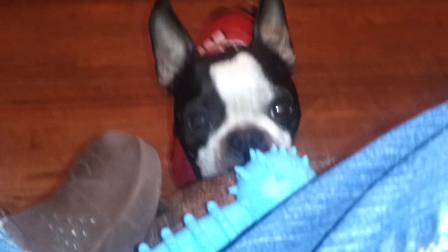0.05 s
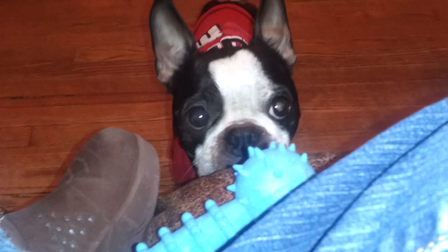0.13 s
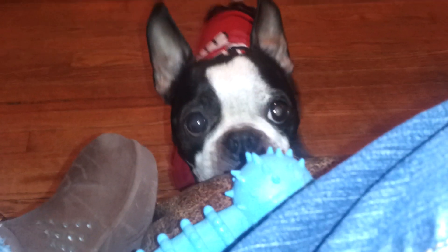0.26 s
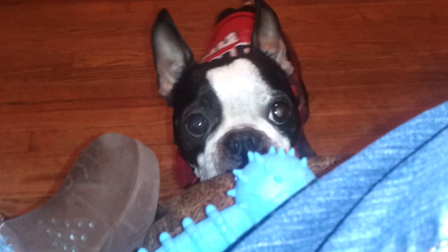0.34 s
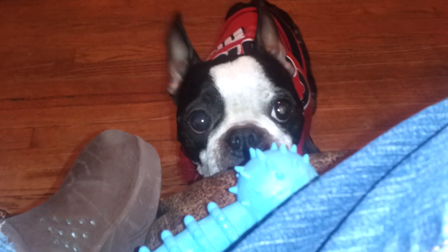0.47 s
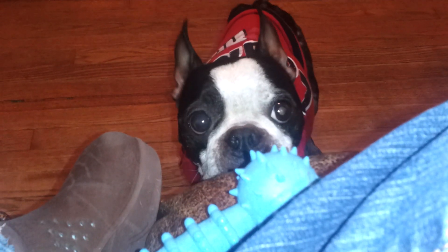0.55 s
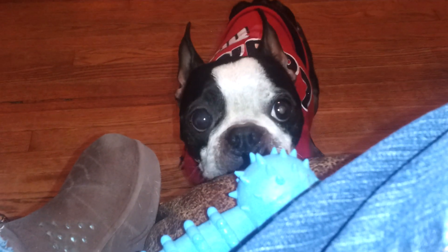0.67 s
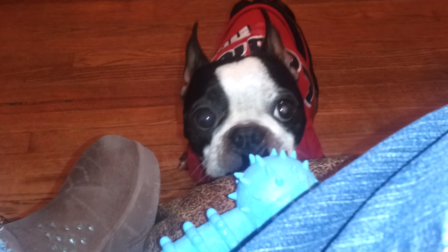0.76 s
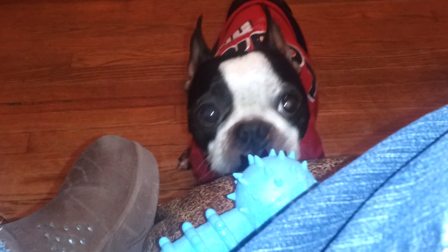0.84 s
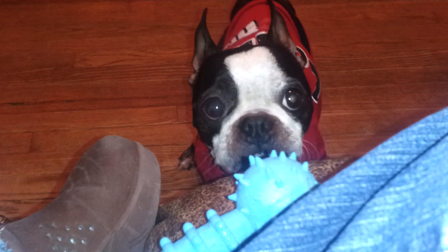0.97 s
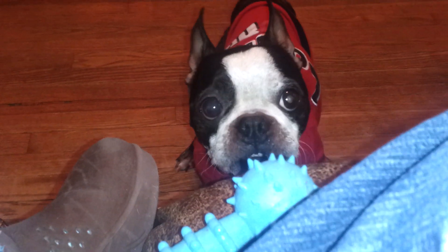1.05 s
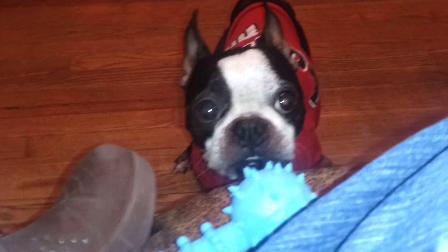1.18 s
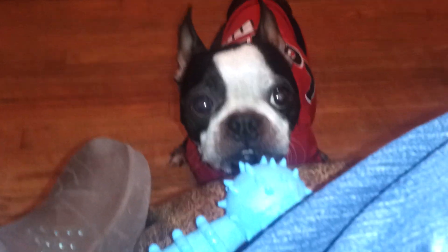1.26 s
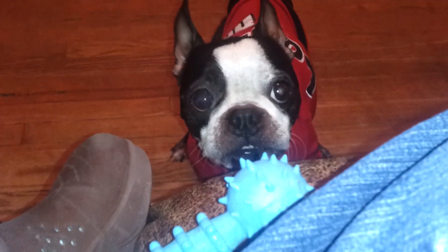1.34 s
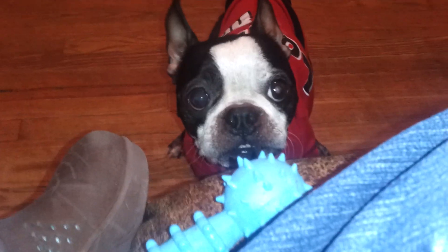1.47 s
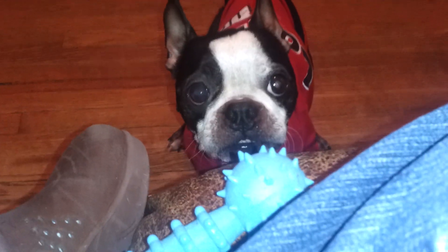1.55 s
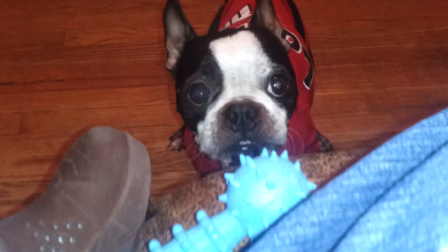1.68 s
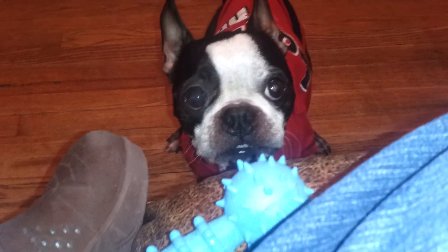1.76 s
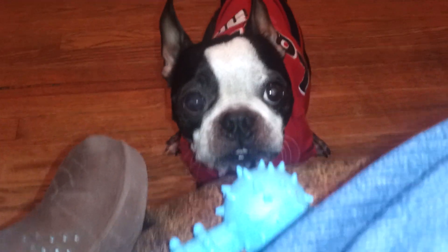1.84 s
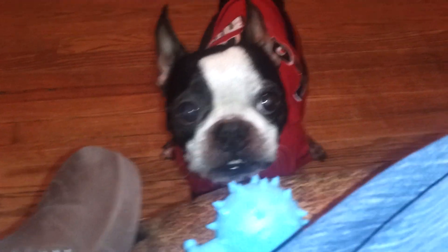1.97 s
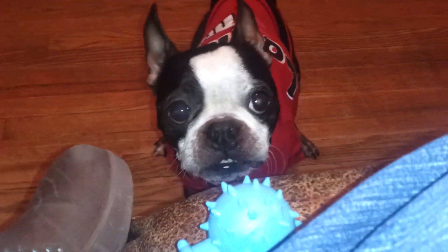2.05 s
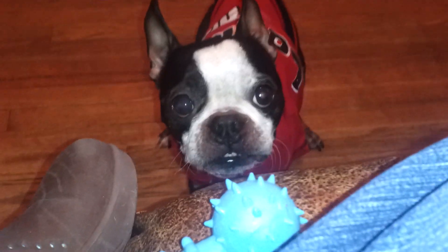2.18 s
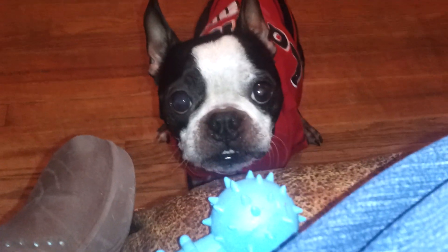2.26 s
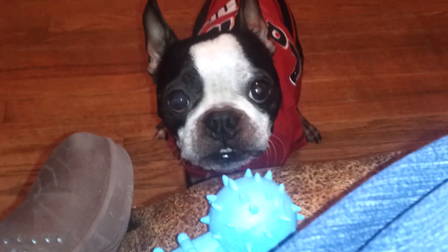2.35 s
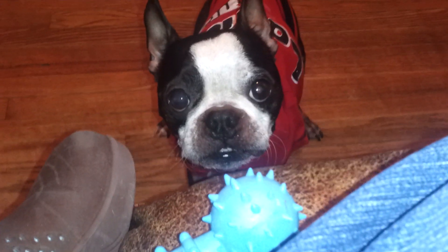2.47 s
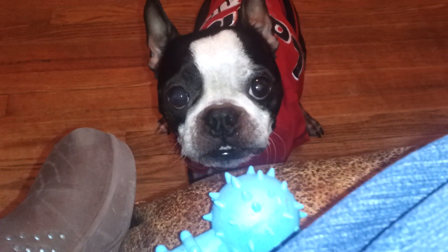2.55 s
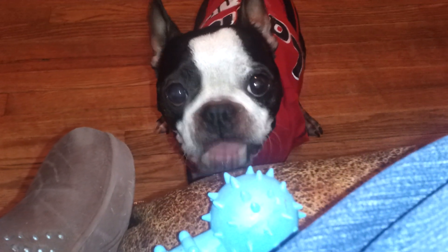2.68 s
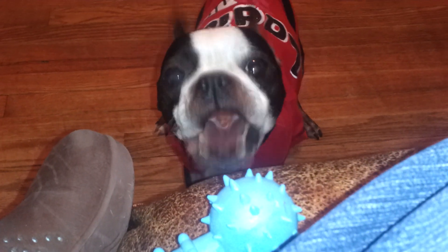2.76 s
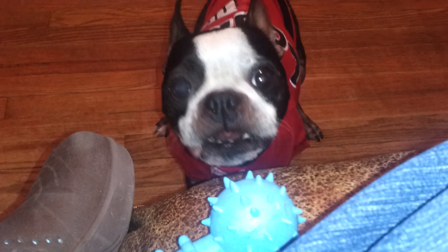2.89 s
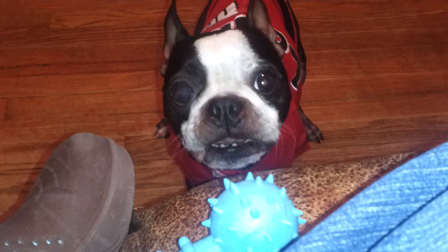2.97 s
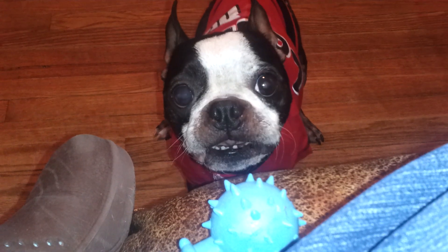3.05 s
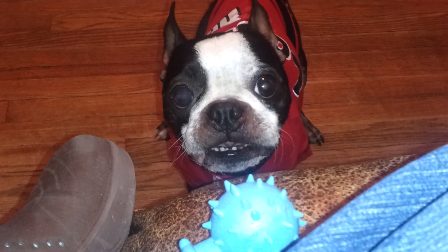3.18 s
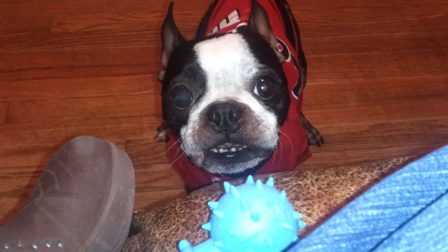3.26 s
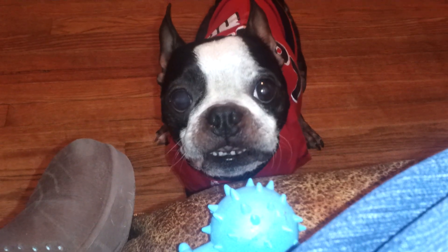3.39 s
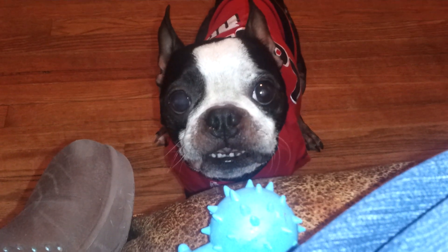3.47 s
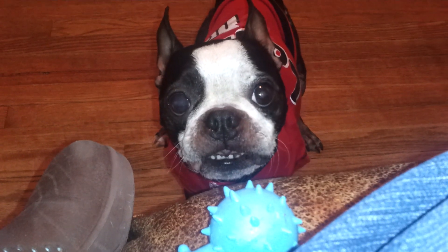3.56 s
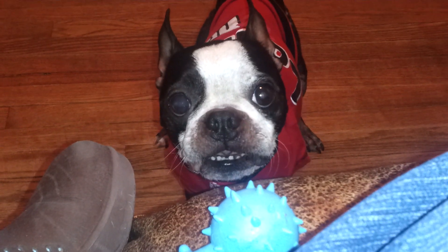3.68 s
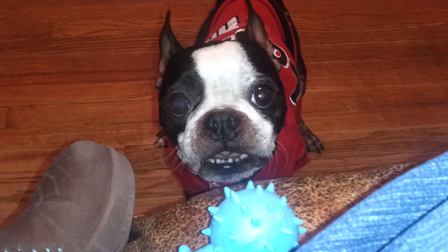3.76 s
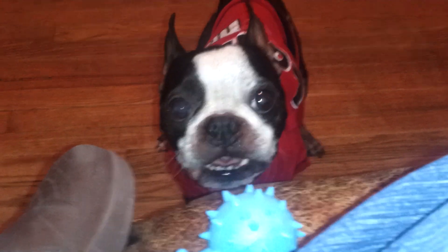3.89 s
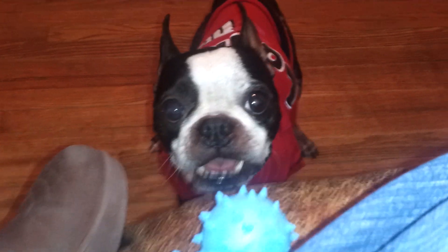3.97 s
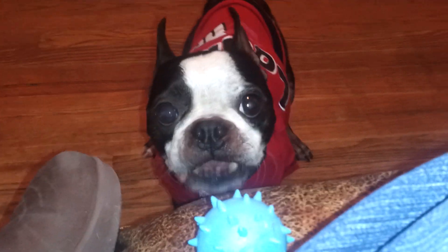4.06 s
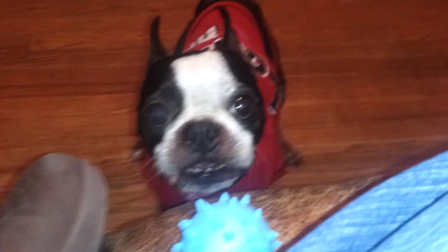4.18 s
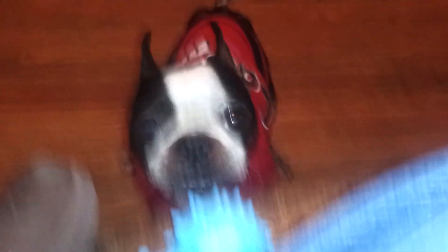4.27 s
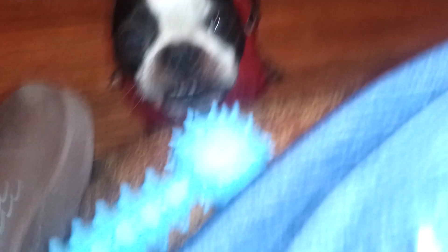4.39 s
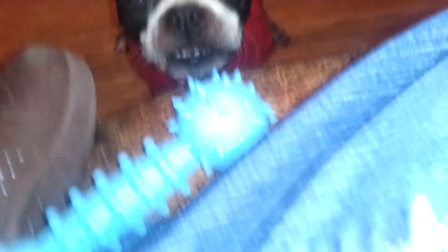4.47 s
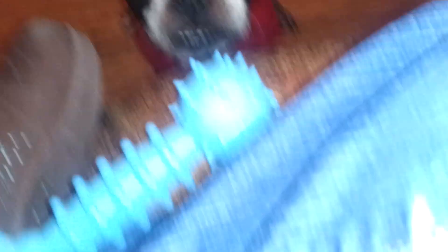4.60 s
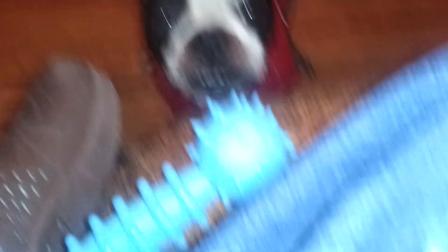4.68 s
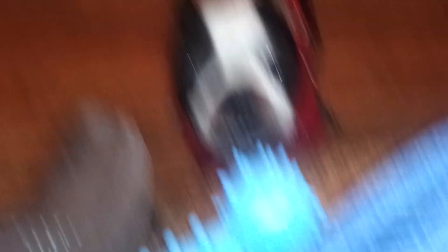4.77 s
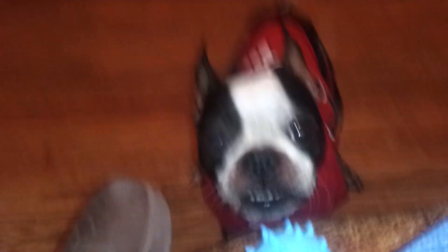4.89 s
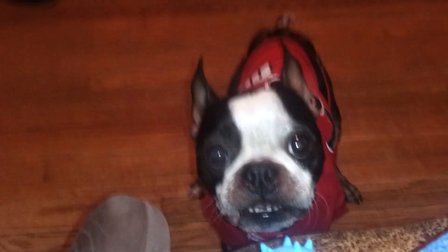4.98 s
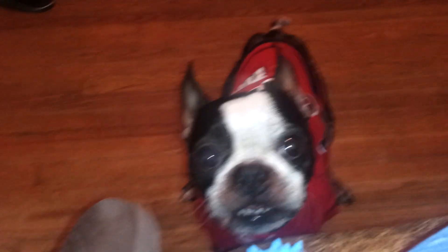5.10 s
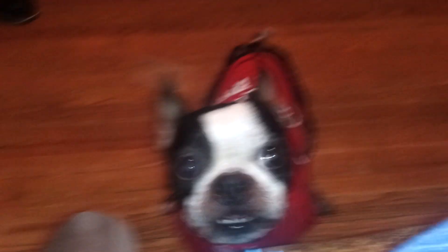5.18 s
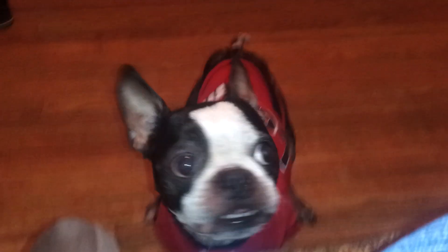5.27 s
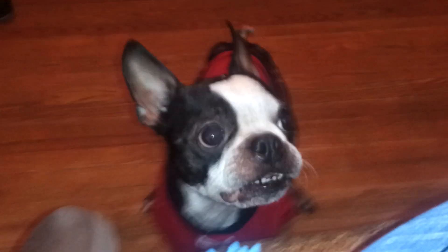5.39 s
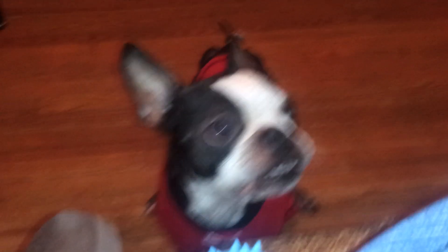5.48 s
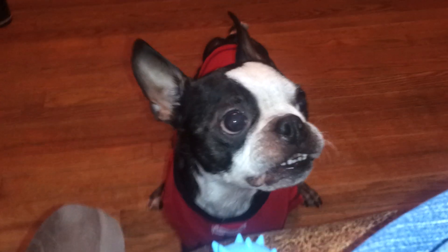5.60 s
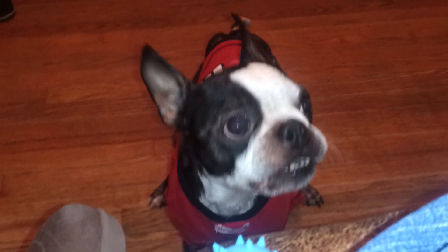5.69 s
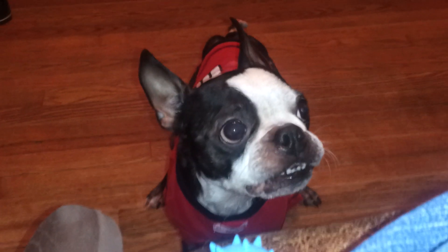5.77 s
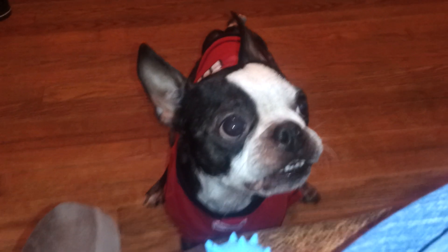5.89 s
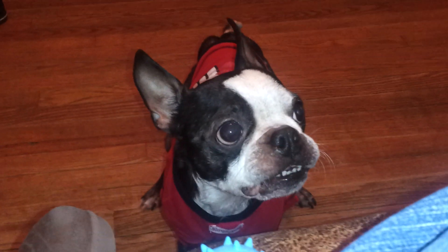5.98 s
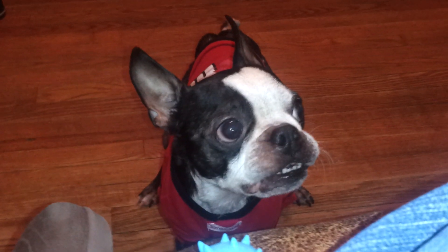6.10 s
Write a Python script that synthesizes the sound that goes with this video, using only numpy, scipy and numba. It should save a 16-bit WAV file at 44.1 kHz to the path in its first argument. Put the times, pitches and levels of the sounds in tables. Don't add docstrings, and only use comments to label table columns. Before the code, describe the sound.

Quiet room tone with low hum and hiss, then a dog's airy snort and soft wavering moan. Paw thuds and claw ticks follow on boards. Abrupt, very loud calls come next: a squeaky yelp, a hoarse bark, a yelp and bark together, another bark, a small rising and sinking whine and one last bark. Gasps fall between them. The close phone microphone overloads, the hard room rings briefly, and the end is nearly still.

```python
import sys
import numpy as np
from scipy import signal
from scipy.fft import rfft, irfft
from scipy.io import wavfile
from scipy.ndimage import uniform_filter1d
from numba import njit

SR = 44100
rng = np.random.default_rng(int(sys.argv[2]) if len(sys.argv) > 2 else 0)


def volts(x):
    e = np.asarray(x, float) / 20
    return 10 ** e


def master_out(mix):
    frames = np.transpose(np.atleast_2d(mix))
    ceiling = np.clip(frames, -1, 1)
    pcm = np.round(ceiling * 32767).astype(np.int16)
    wavfile.write(sys.argv[1], SR, pcm)


N = 270774


@njit
def moving_bandpass(x, hz, width):
    y, b, l = np.empty(len(x)), 0., 0.
    for i in range(len(x)):
        g, k = np.tan(np.pi * hz[i] / SR), width / hz[i]
        v = (b + g * (x[i] - l)) / (1 + g * (g + k))
        b, l, y[i] = 2 * v - b, l + 2 * g * v, k * v
    return y


def band(x, hz, width):
    centre_hz = np.clip(hz + np.zeros(len(x)), 30, SR / 2.3)
    return moving_bandpass(x, centre_hz, max(1. * width, 10.))


def double_band(x, hz, width):
    return band(band(x, hz, width), hz, width)


def resonances(x, modes):
    return sum((-1) ** k * volts(db) * band(x, hz, width) for k, (hz, width, db) in enumerate(modes))


def butter(x, order, hz, kind):
    return signal.sosfilt(signal.butter(order, hz, kind, fs=SR, output="sos"), x)


def unit(x):
    return x / np.sqrt(np.mean(x ** 2))


def read(table):
    s, *columns = np.transpose(table)
    t = np.arange(int(s[0] * SR), int(s[-1] * SR))
    return t[0], [np.interp(t / SR, s, c) for c in columns]


def steps(values, length):
    return np.interp(np.linspace(0, 1, length), np.linspace(0, 1, len(values)), values)


def add(out, start, x):
    edge = np.arange(len(x))
    out[start:start + len(x)] += x * np.minimum(np.minimum(edge, edge[::-1]) / 88, 1)


def folds(hz, rough, weak):
    noise = rng.standard_normal((3, 24000))[:, :len(hz)]
    rough = np.clip(rough, 0, 1)
    shake = unit(uniform_filter1d(uniform_filter1d(noise[0], size=90), size=90))
    phase = np.cumsum(hz * (1 + 0.1227 * rough * shake)) / SR
    harmonics = np.arange(1, 44)[:, None]
    rolloff = np.exp(-(harmonics * hz / 8000) ** 4)
    clean = np.sum(np.cos(2 * np.pi * harmonics * phase) * rolloff, axis=0)
    alternation = 1 + weak * np.cos(np.pi * phase)
    size = alternation * volts(3.1 * rough * unit(uniform_filter1d(noise[1], size=120)))
    hiss = noise[2] * (1 + 0.5 * np.cos(2 * np.pi * phase))
    return size * (clean * np.sqrt(hz / SR) * 2 + 3.31 * rough * hiss)


def call(out, table, voice, throat, mouth_width_hz, top_hz):
    start, (pitch_hz, level_db) = read(table)
    rough, weak, mouth_over_pitch, throat_db = (steps(v, len(pitch_hz)) for v in voice)
    source = folds(pitch_hz, rough, np.clip(weak, 0, 1))
    source = butter(source, 4, top_hz, "low")
    mouth = unit(double_band(source, mouth_over_pitch * pitch_hz, mouth_width_hz))
    share = volts(throat_db)
    voiced = (mouth - share * unit(resonances(source, throat))) / np.sqrt(1 + share ** 2)
    add(out, start, volts(level_db) * voiced)


def air(out, puffs, edge_db, colour):
    for s, rise, hold, fall, top_db in puffs:
        moments = s + np.cumsum(np.abs([0, rise, hold, fall]))
        levels = top_db + np.array([edge_db[0], 0, 0, edge_db[1]])
        start, (level_db,) = read(np.transpose([moments, levels]))
        noise = rng.standard_normal((2, SR))[:, :len(level_db)]
        flutter = volts(2.6 * unit(uniform_filter1d(noise[1], size=400)))
        rush = butter(resonances(noise[0], colour), 4, 9500, "low")
        add(out, start, volts(level_db) * unit(flutter * rush))


# freq_hz, density_db (per Hz)
FLOOR_SPECTRUM = [(18, -53.5), (30, -25.5), (75, 0), (175, -3.5), (320, -5), (660, -9), (5660, -12.5),
                  (13500, -17.5)]


def room_tone():
    hz, db = np.transpose(FLOOR_SPECTRUM)
    shape_db = np.interp(np.log(np.fft.rfftfreq(N, 1 / SR) + 1), np.log(hz), db)
    return volts(-61.5) * unit(irfft(rfft(rng.standard_normal(N)) * volts(shape_db), N))


# start_s, rise_s, hold_s, fall_s, level_db
SNORTS = [
    (0, 0.00053, 0.0036, 0.066, -48),
    (0.145, 0.083, 0.0067, 0.13, -32),
    (5.198, 0.079, 0.0058, .07, -69),
]
SNORT_EDGES = (-27, -19)
# freq_hz, width_hz, level_db
NOSE_MODES = [(2900, 1750, -0.64), (4230, 5450, -0.38), (6600, 2440, 1.3)]


def snort(out):
    air(out, SNORTS, SNORT_EDGES, NOSE_MODES)


# start_s, peak_db, thud_hz, tick_db (against the thud)
CLAW_TICKS = [(0.039, -33.5, 132, -24), (1.109, -41, 340, -9), (1.139, -33, 147, -18.5),
              (1.185, -29, 149, -16), (1.359, -48, 288, -1.5), (1.458, -37, 345, -6.5),
              (3.859, -23.5, 283, -9), (3.909, -25, 345, -29.5), (4.619, -30.5, 527.4, -3),
              (4.654, -37, 137.6, -28), (5.279, -43, 253, -9)]


def claws(out):
    t = np.arange(2000) / SR
    for s, peak_db, thud_hz, tick_db in CLAW_TICKS:
        noise = rng.standard_normal((2, len(t)))
        thud = 6 * band(noise[0] * np.exp(-t / 0.0057), thud_hz, thud_hz)
        tick = double_band(noise[1], 6000, 6000) * np.exp(-t / 0.0051)
        start = int(s * SR)
        out[start:start + len(t)] += volts(peak_db - 13.5) * (thud + volts(tick_db + 10.5) * tick)


# start_s, rise_s, hold_s, fall_s, level_db
GASP_PUFFS = [
    (.37, 0.018, .12, 0.1, -64),
    (1.44, 0.024, 0.056, 0.036, -61),
    (1.96, 0.086, 0.14, 0.097, -54.5),
    (3.279, 0.099, 0.067, 0.024, -55.5),
]
MOUTH_AIR_EDGES = (-8, -16.5)
# freq_hz, width_hz, level_db
OPEN_MOUTH_MODES = [(710, 70, -4), (1350, 430, -4), (1740, 560, -5.5), (3200, 680, -10.5), (6750, 460, -10)]


def gasps(out):
    air(out, GASP_PUFFS, MOUTH_AIR_EDGES, OPEN_MOUTH_MODES)


# time_s, pitch_hz, level_db
MOAN_CURVE = [(.582, 198.9, -53), (.598, 203, -42.5), (.625, 252.5, -33), (.67, 252.4, -35.5),
              (.7, 237.7, -37.5), (.77, 250, -39), (.86, 259.9, -40), (.905, 229, -48)]
# rough (0-1), weak (0-1), mouth_over_pitch (ratio), throat_db
MOAN_FOLDS = [
    (0.48, 0.11, 0.38, 0.31, 0.47),
    (0.62, .03, .1, 0.89, 2.6),
    (1.95, 2.01, 1.8, 1.95, 1.53, 1.55),
    (-7, -0.5, 4, 0.5, -18),
]
# freq_hz, width_hz, level_db
MOAN_MODES = [(127, 13, 10), (930, 870, 8.5), (1260, 300, 6)]
# start_s, rise_s, hold_s, fall_s, level_db
MOAN_PUFFS = [
    (.6, 0.13, .02, 0.57, -47.5),
    (0.64, .04, 0.0086, 0.048, -59),
]
MOAN_AIR_EDGES = (-10.5, -41)
# freq_hz, width_hz, level_db
MOAN_AIR_MODES = [(2327, 130, 7.5), (4060, 1450, 4.5), (5680, 870, 9), (9000, 6700, -2)]


def moan(out):
    call(out, MOAN_CURVE, MOAN_FOLDS, MOAN_MODES, mouth_width_hz=186, top_hz=1394)
    air(out, MOAN_PUFFS, MOAN_AIR_EDGES, MOAN_AIR_MODES)


# time_s, pitch_hz, level_db
WHISTLE_CURVE = [(1.15, 2900, -81.5), (1.3, 3010, -64.5), (1.4, 2790, -80.5)]


def whistle(out):
    start, (pitch_hz, level_db) = read(WHISTLE_CURVE)
    add(out, start, volts(level_db) * np.sin(2 * np.pi * np.cumsum(pitch_hz) / SR))


# time_s, pitch_hz, level_db
START_CURVE = [(1.576, 450.5, -42.5), (1.6, 488, -20.5), (1.62, 523.5, -8.5), (1.632, 499, -14),
               (1.645, 485, -29)]
# rough (0-1), weak (0-1), mouth_over_pitch (ratio), throat_db
START_FOLDS = [
    (.5, .33),
    (.4, .3),
    (2.05, 2.0),
    (-6, -5),
]
# freq_hz, width_hz, level_db
START_MODES = [(229, 86, -5), (1540, 500, 4), (3120, 600, -11), (4900, 900, -9), (7440, 1500, -6)]
# time_s, pitch_hz, level_db
SQUEAK_CURVE = [(1.625, 677.5, -34), (1.635, 700, -5.5), (1.69, 718.4, -11.5), (1.705, 710, -43.5)]
# rough (0-1), weak (0-1), mouth_over_pitch (ratio), throat_db
SQUEAK_FOLDS = [
    (.22, .09),
    (.3, .13),
    (1.85, 1.85),
    (8, 15),
]
# freq_hz, width_hz, level_db
SQUEAK_MODES = [(710, 120, -2), (2797, 540, 12), (3480, 430, 11), (4250, 500, 1), (5600, 410, 4.5),
                (7410, 2700, 0)]


def first_yelp(out):
    call(out, START_CURVE, START_FOLDS, START_MODES, mouth_width_hz=330, top_hz=9000)
    call(out, SQUEAK_CURVE, SQUEAK_FOLDS, SQUEAK_MODES, mouth_width_hz=600, top_hz=10900)


# start_s, rise_s, hold_s, fall_s, level_db
HAND_SHIFTS = [
    (1.71, 0.0065, .01, 0.37, -56),
    (3.84, .03, .005, 0.16, -43),
    (4.57, 0.0099, .06, 0.11, -63.5),
]
HAND_EDGES = (-17, -32)
# freq_hz, width_hz, level_db
GRIP_MODES = [(60, 14, -0.5), (140.8, 120, -2.5)]


def handling(out):
    air(out, HAND_SHIFTS, HAND_EDGES, GRIP_MODES)


# start_s, length_s, level_db, wide_hz (mouth at its widest), closed_hz (closed again)
BARK_EVENTS = [
    (2.171, 0.15, -0.5, 985, 999.3),
    (2.818, 0.17, -0.5, 990, 891.2),
    (3.478, 0.16, 0, 989, 880.7),
    (4.169, 0.17, -3, 1040, 867.5),
]
# freq_hz, width_hz, level_db
BARK_MODES = [(3360, 730, -24.5), (6000, 1600, -23), (6800, 1300, -21), (8370, 1400, -28)]
BARK_SECOND_HZ = (1747, 1590, 1538, 1637, 1837)
BARK_ROUGHNESS = .3, .4, .3, .36
BARK_UPPER_LEVELS = 0.1, -1.3, -1.2, 0.8
MOUTH_SHUT_HZ, MOUTH_OPENS_S, MOUTH_HOLDS_S, MOUTH_CLOSES_S = 809, .05, .017, .04
ATTACK_S, CHEST_S = .03, .027
OVERLOAD_DB = 7


def barks(out):
    for s, length, top_db, wide_hz, closed_hz in BARK_EVENTS:
        t = np.arange(int(length * SR)) / SR
        moments = np.cumsum([0, MOUTH_OPENS_S, MOUTH_HOLDS_S, MOUTH_CLOSES_S])
        mouth_hz = np.interp(t, moments, [MOUTH_SHUT_HZ, wide_hz, wide_hz, closed_hz])
        third_hz = np.interp(t, moments[2:], [2850, 3.08 * closed_hz])
        second_hz = steps(BARK_SECOND_HZ, len(t))
        rough = steps(BARK_ROUGHNESS, len(t))
        upper_db = steps(BARK_UPPER_LEVELS, len(t))
        onset_db = -25.5 * np.clip(1 - t / ATTACK_S, 0, 1) ** 1.3
        sag_db = -7.5 * (t / length) ** 6.3
        level_db = top_db + onset_db + sag_db
        source = folds(mouth_hz / 2, rough, 0.33)
        source = butter(source, 4, 600, "high")
        mouth = double_band(source, mouth_hz, 260)
        second = volts(-8.0) * double_band(source, second_hz, 450)
        third = volts(-7.5) * double_band(source, third_hz, 600)
        upper = third + band(resonances(source, BARK_MODES), 3400, 10000)
        effort_db = level_db + OVERLOAD_DB * np.clip((level_db + 3.0) / 11, 0, 1)
        start = int(s * SR)
        add(out, start, volts(effort_db) * unit(mouth - second + volts(upper_db) * upper))
        puff = unit(double_band(rng.standard_normal(SR)[:len(t)], 250, 200))
        add(out, start, volts(-26.5) * puff * t / CHEST_S * np.exp(1 - t / CHEST_S))


# time_s, pitch_hz, level_db
RISE_CURVE = [(2.595, 183.8, -63), (2.625, 291.5, -49), (2.65, 565.3, -24), (2.67, 766, -16),
              (2.682, 899, -13.5), (2.712, 904, -10.5)]
# rough (0-1), weak (0-1), mouth_over_pitch (ratio), throat_db
RISE_FOLDS = [
    (.06, .05, .17),
    (.05, .09),
    (1.5, 1.6, 1.6, 1.05, 1.01),
    (-22, -22, -12),
]
# freq_hz, width_hz, level_db
RISE_MODES = [(1500, 1400, 0)]
# time_s, pitch_hz, level_db
SECOND_YELP_CURVE = [(2.645, 698.4, -51), (2.675, 688.3, -25), (2.695, 689.7, -4.5), (2.735, 678.7, -2.5),
                     (2.785, 690, -8), (2.8, 680, -29.5)]
# rough (0-1), weak (0-1), mouth_over_pitch (ratio), throat_db
SECOND_YELP_FOLDS = [
    (.6, .45, .2, .06, .05),
    (.6, .8, .6, .25, .1),
    (1.49, 1.51, 1.5, 1.52, 1.97, 1.99, 1.98),
    (3, -5, 9, 14),
]
# freq_hz, width_hz, level_db
SECOND_YELP_MODES = [(2330, 180, 5), (2712, 120, 5.5), (4115, 400, 0), (5664, 400, 1), (7560, 4700, -12)]


def second_yelp(out):
    call(out, RISE_CURVE, RISE_FOLDS, RISE_MODES, mouth_width_hz=650, top_hz=1400)
    call(out, SECOND_YELP_CURVE, SECOND_YELP_FOLDS, SECOND_YELP_MODES, mouth_width_hz=350, top_hz=11000)


# time_s, pitch_hz, level_db
WHINE_CURVE = [(3.945, 360, -44.5), (3.971, 491, -31.5), (3.995, 550, -25), (4.025, 600, -18),
               (4.053, 604, -20), (4.069, 580, -30), (4.1, 465, -34.5), (4.15, 315, -38)]
# rough (0-1), weak (0-1), mouth_over_pitch (ratio), throat_db
WHINE_FOLDS = [
    (.18, .06, .07, .15),
    (.05, .03),
    (1.6, 1.7, 1.85, 2.2),
    (-8, -3, 1, -5),
]
# freq_hz, width_hz, level_db
WHINE_MODES = [(540, 390, 5), (2820, 1200, -6), (4194, 390, 7), (4900, 600, 3), (5623, 280, -2.5),
               (7823, 1100, -13)]


def whine(out):
    call(out, WHINE_CURVE, WHINE_FOLDS, WHINE_MODES, mouth_width_hz=650, top_hz=8000)


# start_s, rise_s, hold_s, fall_s, level_db
LATE_GASP_PUFFS = [
    (4.72, 0.12, 0.038, .05, -57),
    (4.95, .035, .005, .04, -64),
]
# freq_hz, width_hz, level_db
SHUT_MOUTH_MODES = [(700, 70, -2), (1310, 190, -1), (1610, 250, -4)]


def late_gasps(out):
    air(out, LATE_GASP_PUFFS, MOUTH_AIR_EDGES, SHUT_MOUTH_MODES)


@njit
def walls(x, lags, gain, damp):
    line, soft, out = np.zeros((8, 4096)), np.zeros(8), np.zeros(len(x))
    for i in range(len(x)):
        total = 0.
        for k in range(8):
            soft[k] += (1 - damp) * (gain[k] * line[k, (i - lags[k]) & 4095] - soft[k])
            total += soft[k]
            out[i] += soft[k] * (1 - 2 * (k % 2))
        for k in range(8):
            line[k, i & 4095] = x[i] + soft[k] - total / 4
    return out


def bare_room(dry):
    T60_S = 0.42
    lags = np.array([397, 709, 1093, 1523, 1951, 2411, 2903, 3389])
    ring = walls(dry + 1e-18, lags, volts(-60 * lags / SR / T60_S), 0.1)
    return butter(ring, 3, 450, "high")


def scene():
    dog = np.zeros(N)
    for source in (snort, claws, gasps, moan, whistle, first_yelp, handling, barks, second_yelp, whine, late_gasps):
        source(dog)
    near = volts(4.0) * dog + volts(-9.5) * bare_room(dog)
    DUCK_DB, DUCK_S = -25.5, .05
    loudness = uniform_filter1d(np.abs(near), int(DUCK_S * SR))
    return (near + room_tone() / (1 + loudness / volts(DUCK_DB)))[None]


def low_pass(x):
    return signal.sosfilt(signal.butter(12, 16480, fs=SR, output="sos"), x)


def record(dry):
    CEILING, TOP_HZ = 0.62, 15800
    flattened = dry / (1 + np.abs(dry / CEILING) ** 6.84) ** (1 / 6.9)
    tilted = butter(flattened, 4, 52, "high")
    mix = signal.sosfiltfilt(signal.ellip(8, .1, 40, TOP_HZ, fs=SR, output="sos"), tilted)
    return low_pass(mix)


dry = scene()
out = record(dry)
master_out(out)
```